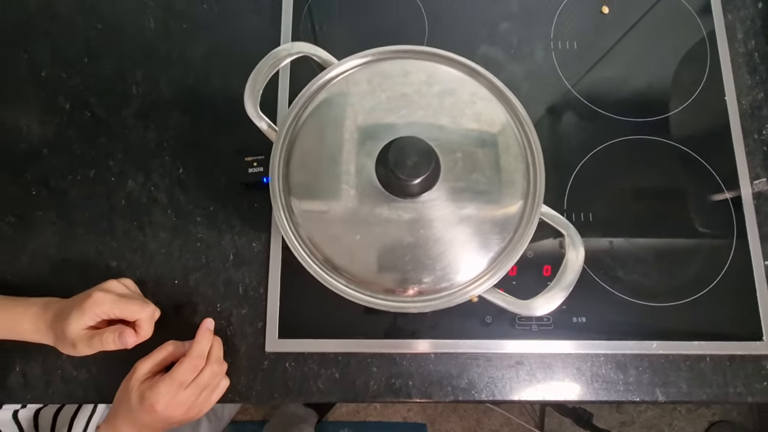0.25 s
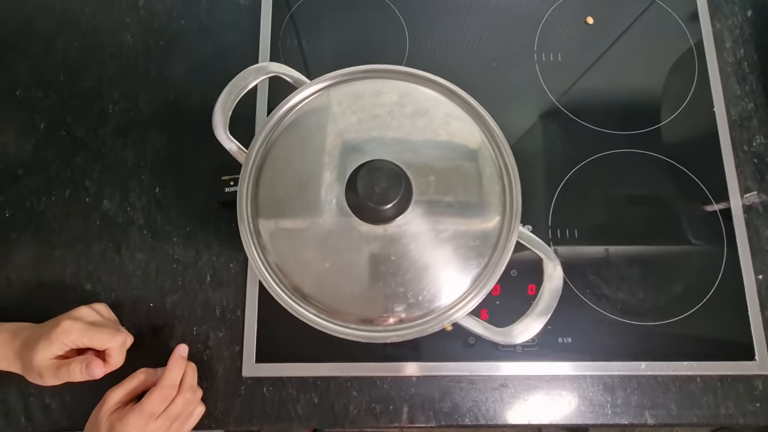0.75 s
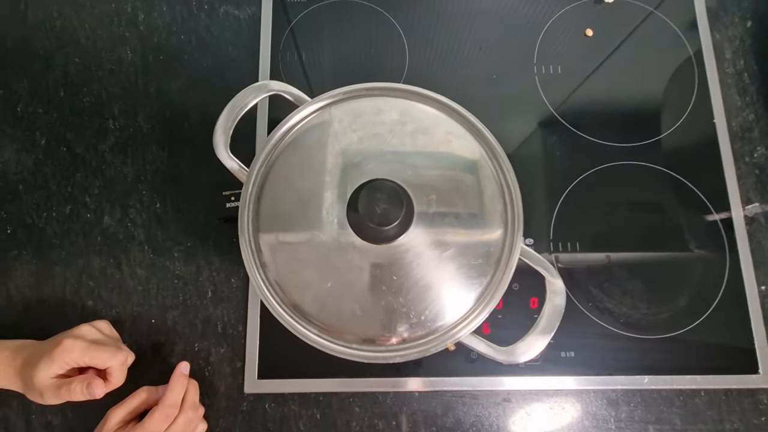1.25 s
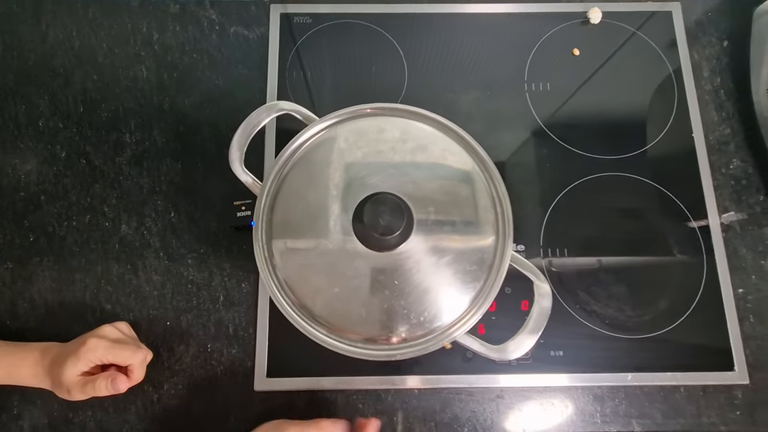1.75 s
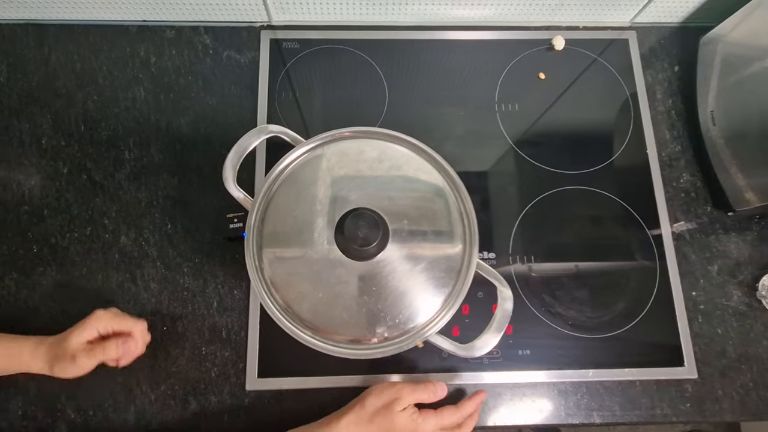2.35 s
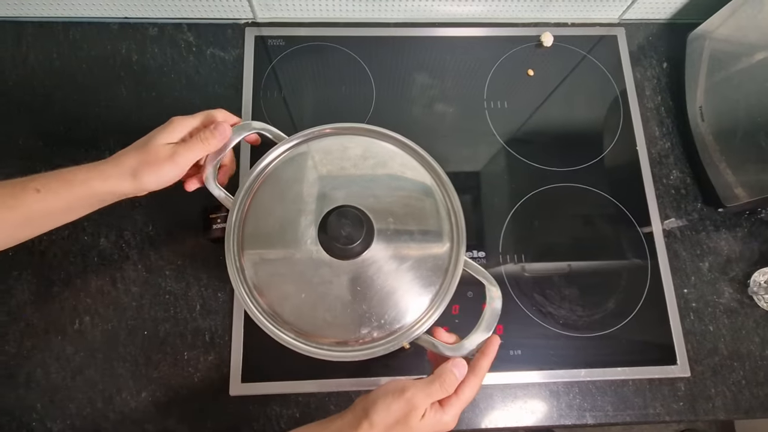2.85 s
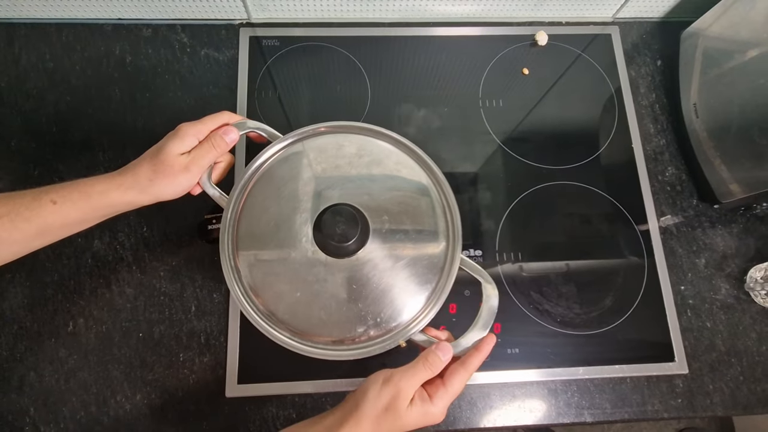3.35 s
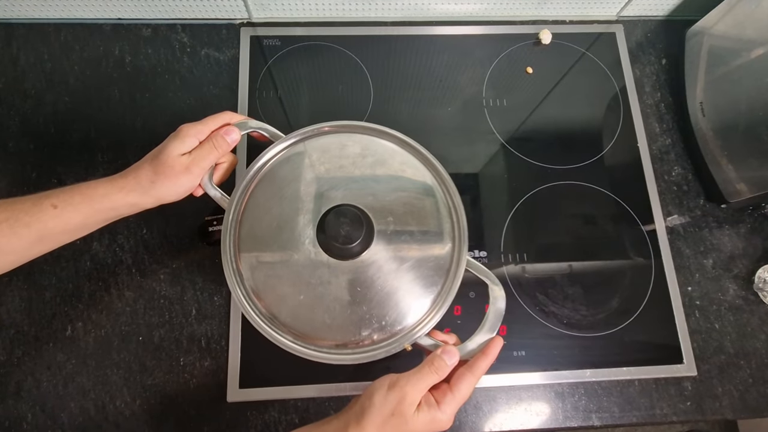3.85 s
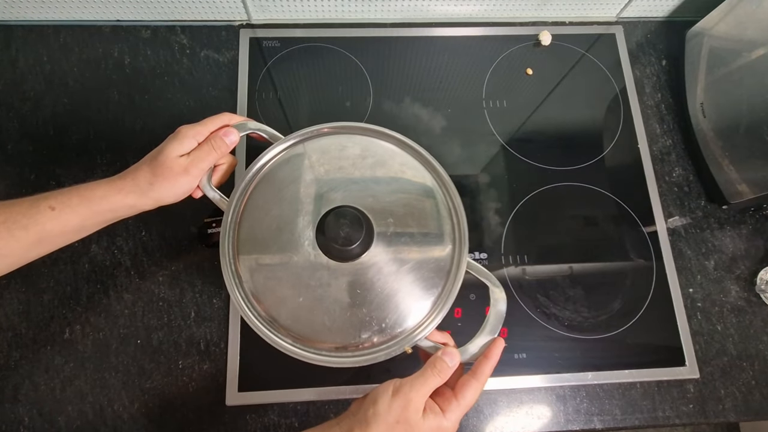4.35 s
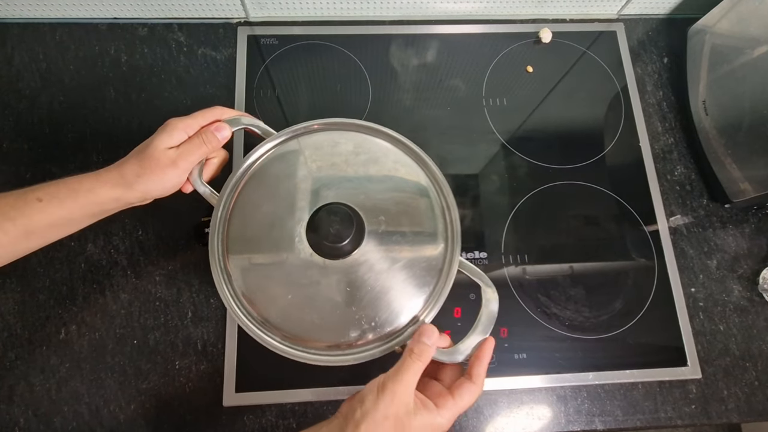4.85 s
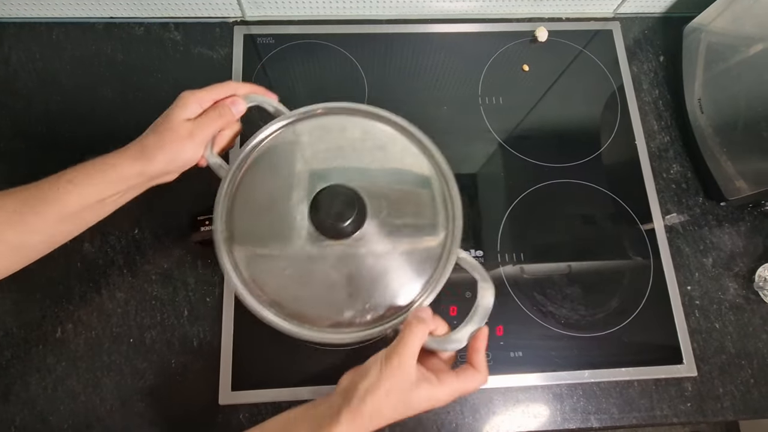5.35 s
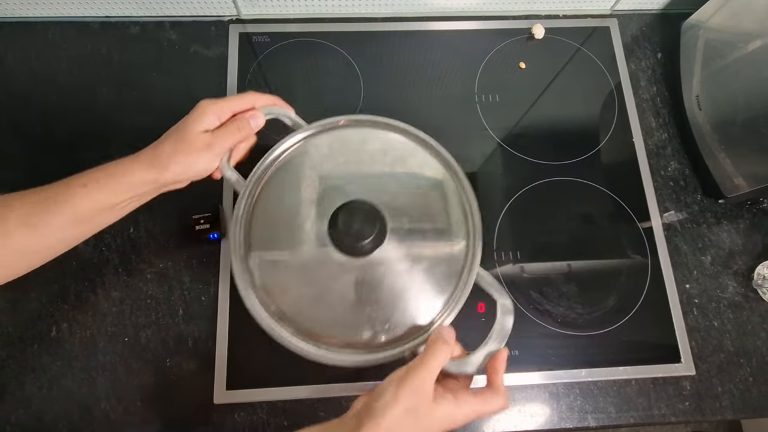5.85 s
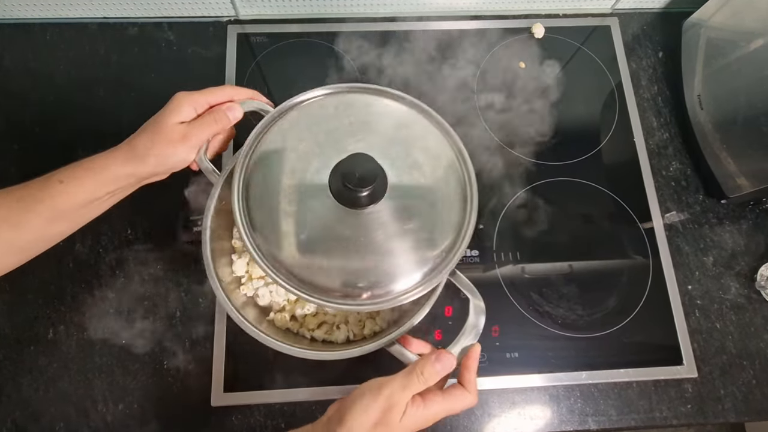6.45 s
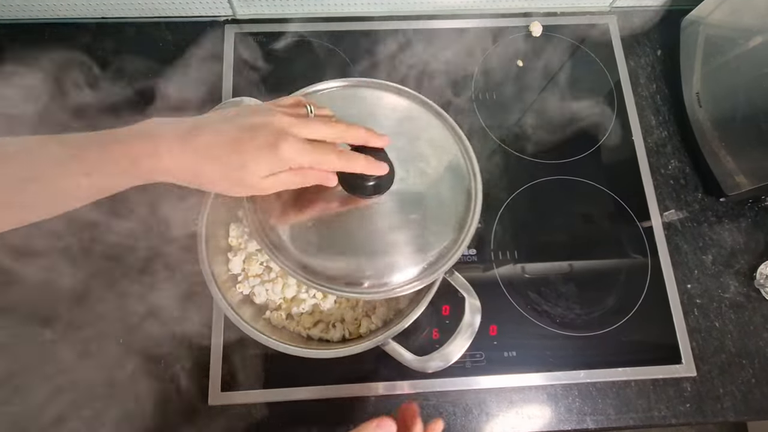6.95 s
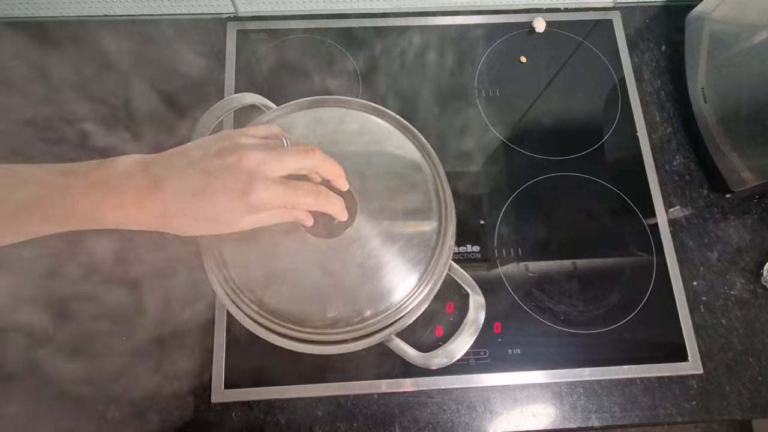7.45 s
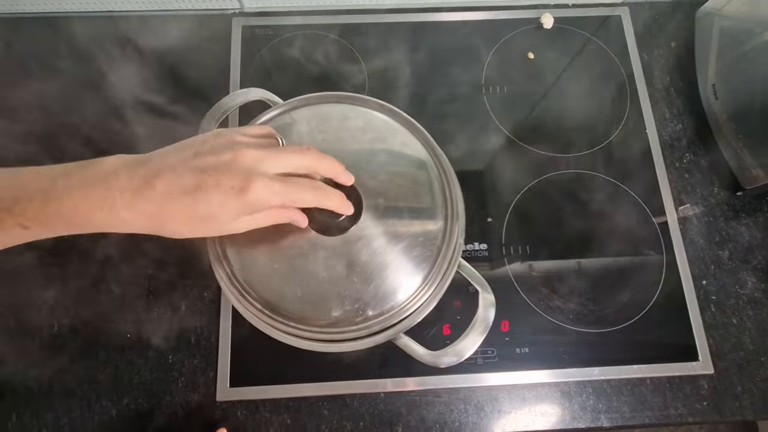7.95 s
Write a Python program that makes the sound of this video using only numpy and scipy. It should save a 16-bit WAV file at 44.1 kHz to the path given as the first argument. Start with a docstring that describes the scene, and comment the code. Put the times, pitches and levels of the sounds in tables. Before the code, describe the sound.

In a small kitchen, kernels burst under the lid of a steel pot: sparse faint ticks with brief oil spitting, then stronger thumping pops with metallic knocks. The pot is then shaken, popcorn swishing and rattling until the lid slips, rings and clatters. The lid is dragged back, a tiny steam spurt follows, and only soft hiss remains. Close microphone, sound in the left channel; faint hiss in the right.

```python
"""Popcorn bursts under the lid of a steel pot on an induction hob while oil spits, then calms, and hob and oil
hiss throughout. The pot is then shaken: popcorn slides, the lid slips off the rim, clatters and is dragged
home, and steam spurts past it. Noise bursts make the cracks; decaying modes make the air thump and the metal
ring; dense grains make the sliding and spitting. Left is the live microphone input; right is a faint hiss."""
import sys
import numpy as np
from scipy import signal
from scipy.fft import rfft, irfft
from scipy.io import wavfile

SR = 44100
rng = np.random.default_rng(int(sys.argv[2]) if len(sys.argv) > 2 else 0)


def generate_wav(sig):
    """Save sig (samples, or channels by samples) to the path in sys.argv[1] as 16-bit PCM at SR."""
    pcm = np.round(np.clip(np.atleast_2d(sig).T, -1, 1) * 32767).astype(np.int16)
    wavfile.write(sys.argv[1], SR, pcm)


N = 362061

# Kernels bursting and bouncing. Each row: time in seconds, knock on the metal in relative dB, knock pitch in Hz,
# crack in relative dB, air thump in relative dB.
BURSTS = [(0.0034, -35, 3180, -32, -37), (0.0412, -38, 1210, -45, -47), (0.0735, -50, 3240, -37.5, -45),
          (0.1138, -43, 3320, -43.5, -56), (0.169, -54, 3260, -44, -70), (0.192, -50, 3220, -42, -54),
          (0.2618, -48, 3360, -49, -55), (0.3824, -56, 3300, -50.5, -59), (0.4212, -28, 3290, -33, -51),
          (0.621, -56, 3300, -42.5, -66), (0.9256, -17, 3330, -28, -24), (0.9772, -34, 3100, -34.5, -41),
          (1.4133, -18.5, 3300, -21, -13), (1.4541, -32, 3340, -39.5, -37), (1.5903, -25, 3440, -56, -52),
          (1.6645, -15.5, 1170, -21.5, -15.5), (1.717, -12, 1180, -48, -40),
          (1.7752, -22.5, 1110, -64, -49), (1.8522, -21, 1080, -46, -42), (1.8768, -4, 1640, -27.5, -17),
          (1.9389, -15.5, 2740, -27.5, -18), (1.9698, -51, 2720, -39, -40),
          (2.2213, -37, 3290, -20.5, -17.5), (2.369, -12.5, 3300, -21.5, -16.5),
          (2.6377, -12.5, 1160, -31, -20.5), (2.7222, -55, 1190, -49, -48),
          (2.8673, -22.5, 1920, -35.5, -28), (2.891, -30, 2860, -41.5, -43.5),
          (3.1202, -9.5, 1110, -22.5, -14), (3.263, -12.5, 3060, -23, -20),
          (3.6764, -26.5, 2370, -39, -47.5), (4.1503, -15, 1610, -25.5, -23),
          (4.189, -1.5, 3204, -21, -17.5), (4.342, -24.5, 2740, -60, -41), (4.39, -26, 1130, -73, -60),
          (4.4535, -38, 2800, -59, -57), (4.4829, -40, 3550, -33.5, -54)]
# Modes of the air in the pot. Each row: pitch in Hz, relative level in dB, decay time t60 in seconds.
AIR_MODES = [(169, -10, .4), (182, 0, .1), (192, -17, .28), (120, -13, .13), (226, -13, .1), (75, -22, .2),
             (307, -9, .12)]
# Modes of the pot wall damped by the seated lid. Each row: pitch in Hz, relative level in dB, t60 in seconds.
WALL_MODES = [(800, -17.5, 0.014), (1080, 2, 0.017), (1110, -12, 0.18), (1168.3, 6.5, 0.13),
              (1194, -3, 0.17), (1252, 3, 0.11), (1355, 2.5, 0.13), (1657, 3.5, 0.054), (1730, 6.5, 0.024),
              (1887, 11, 0.03)]
# Hollow body tone of the pot. Each row: pitch in Hz, relative level in dB, t60 in seconds.
HOLLOW_MODES = [(300, -6, .1), (395, -8, .06), (445, -3, .08), (465, -1, .1), (540, -6, .07),
                (595, -4, .08), (650, -5, .07), (700, -6, .06), (790, -9, .06)]

WANDER_DB, WANDER_PER_S = 3, 14   # every mode is struck harder or softer as the contact point moves


def popping():
    """Bursts under the seated lid: wall follows the knock, lid the crack, hollow the thump; small bits patter."""
    # Small bits settling. Each row: start in seconds, glide in seconds, hold in seconds, relative level in dB.
    patter_rows = [(0, 0.0055, 0.028, -41.5), (1.67, 0.01, 0.02, -30), (1.94, 0.056, 0.024, -45),
                   (4.19, 0.01, 0.019, -35), (4.31, 0.013, 0.014, -46.5)]
    # Colour of the burst crack. Each row: frequency in Hz, relative level in dB per Hz.
    crack_colour = [(290, -20.5), (500, -2), (1390, -12.5), (1890, 1), (2290, -10.5), (3300, 0.5),
                    (3820, -2), (7170, -5), (8600, -16), (14500, -16.5), (16500, -24)]
    # Lid struck from below, damped by the rim. Each row: pitch in Hz, relative level in dB, t60 in seconds.
    lid_modes = [(2600, -8, .04), (2820, -6, .07), (3250, -3, .05), (3400, -2, .06), (4150, -3, .05),
                 (4450, -8, .05), (5300, -8, .04), (5650, -5, .05), (6300, -9, .025), (6900, -8, .025),
                 (7200, -6, .035)]
    s, knock_db, _, crack_db, thump_db = np.transpose(BURSTS)
    # parts: crack, air, wall, lid, hollow
    events = np.transpose([s, crack_db, thump_db, knock_db, crack_db, thump_db])
    drives = blows(events, length_s=0.0077, push_s=0.0014, offsets_db=[4.0, -3.5, 4.5, 21.5, 8.5], strike=0.097)
    patter, = glides(patter_rows, start_db=2, fade_db_per_s=125)
    patter_mix = from_db([[-6.], [-12.], [-9.], [-5.], [-15.]])
    drives += patter * patter_mix * grains(per_s=800, spread_db=-2.0)
    crack, air, wall, lid, hollow = drives
    air = filtered(air, 3, 95, "high")   # the air thump carries no deep rumble
    out = colour(crack, crack_colour) + rings(air, AIR_MODES, wander_db=3.5)
    out += rings(wall, WALL_MODES) + rings(hollow, HOLLOW_MODES) + rings(lid, lid_modes)
    return out + from_db(-11.0) * kernel_knocks(t60=0.026)


def kernel_knocks(t60):
    """Where a kernel lands decides the pitch of its short knock, a decaying sine."""
    t = np.arange(4096) / SR
    out = np.zeros(N + len(t))
    for s, db, hz, *_ in BURSTS:
        i = round(s * SR)
        out[i:i + len(t)] += from_db(db - 60 * t / t60) * np.sin(2 * np.pi * hz * t)
    return out[:N]


def shaking():
    """Knocks and sliding popcorn sound through air, hollow, wall and lid; off its seat the lid frees both to ring."""
    # Pot on the glass, load on the wall, lid on the rim. Each row: time in seconds, then relative dB of crack,
    # air thump, hollow, wall and lid.
    knock_rows = [(4.6803, -49, -41, -56, -49, -69), (4.6973, -48, -47, -43, -69, -67),
                  (4.8298, -34, -35, -44, -29.5, -30.5), (4.8649, -30.5, -28, -35, -31, -48),
                  (4.9619, -28, -34, -24, -36, -21), (4.9736, -31.5, -24.5, -26, -33, -22.5),
                  (5.0929, -35, -31, -37, -30, -32), (5.145, -14.5, -20, -18, -17, -17.5),
                  (5.1601, -18.5, -18.5, -39, -18.5, -32), (5.2335, -25, -26.5, -43, -21, -37),
                  (5.2874, -22, -22, -33, -26, -19), (5.4458, -31, -47, -25, -43, -34),
                  (5.4857, -20, -28, -23, -22.5, -18), (5.5055, -40, -22, -27, -20.5, -21.5),
                  (5.5847, -25.5, -38, -37, -20, -37), (5.6281, -21.5, -31, -28, -18.5, -15),
                  (5.8067, -16.5, -35, -23, -20, -17), (5.8263, -30, -27, -21.5, -18, -20),
                  (5.9194, -23, -37, -34, -19.5, -39), (5.9753, -16, -45, -15.5, -24, -26),
                  (5.9937, -17, -32, -42, -35, -12), (6.0259, -22, -30, -29, -16, -12),
                  (6.0421, -17.5, -29, -35, -13, -11), (6.0851, -17.5, -46.5, -40, -22.5, -22),
                  (6.187, -16.5, -30, -12.5, -27, -38), (6.2914, -21.5, -15, -13.5, -55, -33.5),
                  (6.3196, -18, -37, -12, -19, -24), (6.3415, -18, -45, -16.5, -17, -29.5),
                  (6.3783, -27.5, -39, -7.5, -19, -52), (6.6501, -23.5, -18, -21.5, -21, -32),
                  (6.6803, -14.5, -26.5, -13, -12.5, -26), (6.7059, -18.5, -37, -16, -15.5, -26.5),
                  (6.795, -23, -20, -24, -23, -28), (6.8183, -17.5, -34, -12, -15.5, -22),
                  (6.8456, -17.5, -41.5, -15, -14.5, -17.5), (6.8679, -22, -42.5, -14.5, -15.5, -26),
                  (7.006, -26, -30, -18, -28.5, -28), (7.0667, -25.5, -28.5, -27.5, -34, -30),
                  (7.1302, -22.5, -42, -25, -34.5, -13.5), (7.1462, -13, -42, -27, -16, -8.5),
                  (7.199, -22, -44, -24.5, -33, -14.5), (7.2259, -19.5, -67, -24, -27, -29),
                  (7.263, -31, -43.5, -38, -27, -16.5), (7.3124, -31, -42, -34, -27.5, -23.5),
                  (7.3675, -41, -55.5, -34.5, -33.5, -23.5), (7.4045, -32, -43, -37.5, -31.5, -27.5),
                  (7.476, -37.5, -56, -35.5, -33, -30), (7.8174, -51.5, -72.5, -56, -62, -63.5),
                  (8.1143, -54, -62.5, -61.5, -59, -66)]
    # Popcorn and pot sliding. Each row: start in seconds, glide in seconds, hold in seconds, then relative dB
    # of the slide, the bright rustle and the lid rub.
    slide_rows = [(4.66, 0.035, 0.12, -56.5, -61, -77), (4.85, 0.032, 0.11, -31, -41.5, -53),
                  (5.02, 0.1, 0.015, -26, -39, -42), (5.2, 0.059, 0.028, -25, -37.5, -44.5),
                  (5.37, 0.12, 0.01, -22, -33.5, -43), (5.55, 0.059, 0.022, -28, -36, -41),
                  (5.7, .1, 0.035, -23.5, -32.5, -42), (5.88, 0.071, 0.043, -28, -34, -39),
                  (5.97, 0.013, 0.096, -22.5, -23, -24), (6.18, 0.0065, 0.15, -34.5, -37, -58.5),
                  (6.3, 0.024, 0.072, -25, -29.5, -46), (6.65, 0.014, 0.015, -23, -29, -38.5),
                  (6.79, 0.047, 0.017, -17, -25, -39.5), (7.0, 0.082, 0.025, -34.5, -41, -42),
                  (7.13, 0.014, .08, -28, -34, -36.5), (7.26, 0.027, .14, -37, -47, -44.5)]
    # Wall ringing with the lid off. Each row: pitch in Hz, relative level in dB, t60 in seconds.
    open_wall = [(1044, -25, 0.027), (1111, 7.5, 0.18), (1177, -8.5, 0.12), (1320, 0, 0.05),
                 (1450, -2, 0.14), (1750, -1.5, 0.089), (2567, -0.5, 0.23), (2510, -15, 0.24),
                 (4200, -8.5, 0.06), (4100, -11, 0.05)]
    # Lid ringing free. Each row: pitch in Hz, relative level in dB, t60 in seconds.
    lid_modes = [(2540, -28, 0.093), (2852, -6, 0.054), (2863, 3.5, 0.1), (3000, -17, 0.1),
                 (2885, 5.5, 0.023), (3447, -6, 0.057), (3456, 1, 0.13), (3680, -10.5, 0.085),
                 (4110, -2, 0.059)]
    # Colour of the knock crack. Each row: frequency in Hz, relative level in dB per Hz.
    crack_colour = [(880, -31.5), (1500, -7), (3400, -7), (7100, -12), (8500, -24.5), (12500, -24.5),
                    (15500, -32), (16500, -30.5)]
    lid_off_s, lid_held_s = 5.96, 6.99   # the lid leaves its seat; a hand takes it and drags it home
    seat_damping, held_damping = .15, 0.76   # t60 factors: seat on the lid, hand on wall and lid
    muffle_hz = 5600   # the seated lid dulls cracks
    rub_seated_db, rub_open_db = (-9.5, -2, -10), (-13.5, -5.5, -3)   # rumble, scrape, hollow

    crack, air, hollow, wall, lid = blows(knock_rows, length_s=0.012, push_s=0.0021,
                                          offsets_db=[-2.0, -11.0, 21.0, 21.0, 15.5], strike=0.64)
    slide, rustle, lid_rub = glides(slide_rows, start_db=-14, fade_db_per_s=232.5)
    off = np.arange(N) > lid_off_s * SR
    held = np.arange(N) > lid_held_s * SR
    free = off & ~held
    rub_gains = np.where(off, from_db(rub_open_db)[:, None], from_db(rub_seated_db)[:, None])
    rumble, scrape, hollow_rub = slide * rub_gains

    tumbling = grains(per_s=4000, spread_db=3.)
    crack = crack + rustle * tumbling
    lid = lid + lid_rub * tumbling
    muffled = filtered(crack * ~off, 1, muffle_hz, "low")
    metal = rings(wall * ~off, WALL_MODES) + rings(wall * free, open_wall)
    metal += rings(wall * held, np.array(WALL_MODES) * [1, 1, held_damping])
    metal += rings(lid * ~off, np.array(lid_modes) * [1, 1, seat_damping]) + rings(lid * free, lid_modes)
    metal += rings(lid * held, np.array(lid_modes) * [1, 1, held_damping])
    body = filtered(rings(hollow + hollow_rub * tumbling, HOLLOW_MODES), 2, 260, "high")
    cracks = colour(muffled + crack * off, crack_colour)
    thumps = rings(air + rumble * tumbling, AIR_MODES)
    return cracks + thumps + body + metal + scrape * scraping(patchy_db=4.0, per_s=24)


def scraping(patchy_db, per_s):
    """Dense grains whose colour shifts as the contact wanders: third-octave bands swell on their own."""
    # Colour of the rubbing. Each row: frequency in Hz, relative level in dB per Hz.
    rub_colour = [(120, -42), (200, -9.5), (784, 2), (866, 3), (1100, 4), (1490, -7.5), (2900, -23),
                  (6000, -24), (7800, -57.5), (13200, -120)]
    rubbing = colour(grains(per_s=3500, spread_db=3.), rub_colour)
    out = 0
    for low in 200 * 2 ** np.arange(0, 5, 1 / 3):
        band = filtered(rubbing, 2, [low, low * 2 ** (1 / 3)], "band")
        out = out + from_db(patchy_db * drift(per_s)) * band
    return rms_one(out)


def sizzle():
    """Oil: dense spitting grains at first, lone bright droplet ticks all along."""
    # Oil spits and calms. Each row: start in seconds, glide in seconds, hold in seconds, relative level in dB.
    spit_rows = [(0, .01, 0.31, -48)]
    spits = filtered(grains(per_s=5800, spread_db=3.5), 2, [1500, 9000], "band")
    ticks = filtered(grains(per_s=18, spread_db=1.0), 2, 6000, "high")
    spit_gain, = glides(spit_rows, start_db=6, fade_db_per_s=45)
    return spit_gain * spits + from_db(-76.5) * ticks


def steam():
    """A short bright spurt of coloured noise past the closing lid."""
    # Steam spurt. Each row: start in seconds, glide in seconds, hold in seconds, relative level in dB.
    spurt_rows = [(7.585, .03, 0.015, -43.5)]
    # Colour of the steam. Each row: frequency in Hz, relative level in dB per Hz.
    steam_colour = [(1180, -51), (2000, -11.5), (2670, -41.5), (3490, -2), (4860, 3), (11000, -21),
                    (16000, -32)]
    gain, = glides(spurt_rows, start_db=-4.0, fade_db_per_s=400.5)
    return gain * colour(rng.standard_normal(N), steam_colour)


def hiss():
    """Broad hiss of oil and room as coloured noise, with narrow resonant bands from the hob and the metal."""
    # Hiss over time. Each row: time in seconds, broad hiss in relative dB, narrow bands in relative dB.
    level_rows = [(0, -58, -56.5), (1.5, -54.5, -56), (3, -56.5, -58.5), (4.6, -56.5, -58),
                  (7.5, -55.5, -63.5), (8.21, -62.5, -59.5)]
    # Colour of the broad hiss. Each row: frequency in Hz, relative level in dB per Hz.
    broad_colour = [(18, -42), (30, -12.5), (98, 12.5), (641, -1.5), (792, -38), (858, -1.5), (2220, -12),
                    (3480, 3), (4410, -2), (5440, 5.5), (6380, -20.5), (9500, -16), (13000, -24),
                    (15200, -20.5), (16500, -25)]
    # Narrow hissing bands. Each row: centre in Hz, width in Hz (5 at least), relative level in dB.
    band_rows = [(783.4, 2.9, 14.5), (3385, 38, 12.5), (3760, 13, 17), (3770, 15, -0.5), (4600, 28, -16),
                 (5000, 119, -13), (4910, 87, -23), (5500, 490, 4), (5840, 160, 6.5), (6800, 340, -1.5),
                 (9160, 350, -1), (10100, 58, -11.5), (11300, 500, -13.5), (15030, 850, -8)]
    broad_gain, bands_gain = levels(level_rows)
    noise, narrow = rng.standard_normal(N), 0
    for hz, width, db in band_rows:
        r = np.exp(-np.pi * max(width, 5) / SR)
        resonance = [1, -2 * r * np.cos(2 * np.pi * hz / SR), r * r]
        band = signal.lfilter([1, 0, -1], resonance, noise)
        narrow = narrow + from_db(db) * (1 - r * r) / 2 * band
    return broad_gain * colour(rng.standard_normal(N), broad_colour) + bands_gain * rms_one(narrow)


def kitchen(x):
    """Diffuse echo: octave bands of noise, each dying at its own rate, convolved with the sound."""
    # Echo decay of the kitchen. Each row: frequency in Hz, t60 in seconds.
    decay_rows = [(250, 0.54), (500, 0.56), (2000, 0.56), (6000, 0.25), (14000, 0.42)]
    decay_hz, decay_s = np.transpose(decay_rows)
    t, tail = np.arange(SR) / SR, 0
    for low in 175 * 2. ** np.arange(7):
        band = filtered(rng.standard_normal(SR), 2, [low, min(2 * low, .45 * SR)], "band")
        t60 = np.interp(np.log(np.sqrt(2) * low), np.log(decay_hz), decay_s)
        tail = tail + band * from_db(-60 * t / max(t60, .05))
    tail *= np.clip(t / .015, 0, 1)      # the first walls answer late
    return signal.oaconvolve(x, tail / np.sqrt(np.sum(tail ** 2)))[:N]


def idle_input():
    """Self-noise of the unused right input: band-passed noise, mostly treble."""
    # Self-noise over time. Each row: time in seconds, level in dB.
    idle_rows = [(0, -102), (1.5, -84), (5.95, -86), (6.0, -87), (8.21, -109.5)]
    treble = filtered(rng.standard_normal(N), 6, [5500, 15800], "band")
    return levels(idle_rows)[0] * rms_one(treble)


def blows(events, length_s, push_s, offsets_db, strike):
    """Each blow is a dying noise burst for crack and metal and one soft push on the air: one drive per part."""
    t, parts = np.arange(4096) / SR, len(events[0]) - 1
    push = -np.hanning(round(push_s * SR) + 3)
    push = np.pad(push, (0, len(t) - len(push)))
    drives = np.zeros((parts, N + len(t)))
    for s, *parts_db in events:
        i = round(s * SR)
        burst = rng.standard_normal(len(t)) * np.exp(-t / length_s)
        contact = burst / np.sqrt(np.sum(burst ** 2))
        contact[0] += strike         # metal takes the burst's energy plus a first strike
        burst[0] += 12 * strike      # the crack opens with a snap
        shapes = np.tile(contact, (parts, 1))
        shapes[0], shapes[1] = burst, push
        drives[:, i:i + len(t)] += from_db(np.add(parts_db, offsets_db))[:, None] * shapes
    return drives[:, :N]


def rings(drive, modes, wander_db=WANDER_DB):
    """Drive through a set of decaying modes whose joint response has about unit energy."""
    hz, db, t60 = np.transpose(modes)
    radius = from_db(-60 / (np.maximum(t60, .01) * SR))
    angle = 2 * np.pi * hz / SR
    gains = from_db(db) / np.sqrt(np.sum(from_db(db) ** 2 / (1 - radius ** 2) / 2))
    out = 0
    for g, r, w in zip(gains, radius, angle):
        struck = drive * from_db(wander_db * drift(WANDER_PER_S)) + 1e-18
        out = out + signal.lfilter([0, g * np.sin(w)], [1, -2 * r * np.cos(w), r * r], struck)
    return out


def grains(per_s, spread_db):
    """Random tiny impacts of uneven size and either sign, rms 1."""
    sizes = from_db(spread_db * np.minimum(rng.exponential(1, N), 5)) * rng.choice([-1, 1], N)
    return rms_one(sizes * (rng.random(N) < per_s / SR))


def glides(rows, start_db, fade_db_per_s):
    """Gains per dB column: each row starts start_db above or below its level, glides to it, holds and fades."""
    t, power = np.arange(N) / SR, 0
    for s, glide, hold, *db in rows:
        glide_db = start_db * np.clip(1 - (t - s) / max(glide, .002), 0, 1)
        fade_db = fade_db_per_s * np.maximum(t - s - glide - hold, 0)
        power = power + (from_db(db)[:, None] * from_db(glide_db - fade_db) * (t >= s)) ** 2
    return np.sqrt(power)   # energies of overlapping rows add


def levels(rows):
    """Gains in time from dB columns; silent outside the table."""
    s, *columns = np.transpose(rows)
    t = np.arange(N) / SR
    return [from_db(np.interp(t, s, c, left=-200, right=-200)) for c in columns]


def drift(per_s):
    """Slow random wander: straight lines between normal knots of spread 1."""
    knots = rng.standard_normal(N // 500)
    return np.interp(np.arange(N) / SR * min(per_s, 80), np.arange(len(knots)), knots)


def colour(x, points):
    """Shape by a spectrum in dB over log frequency, keeping white noise at its rms."""
    point_hz, point_db = np.transpose(points)
    hz = np.maximum(np.fft.rfftfreq(len(x), 1 / SR), 10)
    gain = from_db(np.interp(np.log(hz), np.log(point_hz), point_db))
    cepstrum = irfft(np.log(gain + 1e-9))       # folding the cepstrum makes the filter causal
    cepstrum[1:len(cepstrum) // 2] *= 2
    cepstrum[len(cepstrum) // 2 + 1:] = 0
    response = np.exp(rfft(cepstrum)) / np.sqrt(np.mean(gain ** 2))
    return irfft(rfft(x) * response, len(x))


def filtered(x, order, hz, kind):
    """Butterworth filter with its edge or edges in Hz."""
    return signal.sosfilt(signal.butter(order, hz, kind, fs=SR, output="sos"), x)


def from_db(db):
    """dB to gain."""
    return 10 ** (np.asarray(db) / 20)


def rms_one(x):
    """Scale to rms 1."""
    return x / np.sqrt(np.mean(x ** 2) + 1e-20)


def scene():
    """Left: the pot in the kitchen over the hiss; right: the idle input."""
    near = popping() + shaking() + steam() + sizzle()
    left = near + from_db(-12) * kitchen(near) + hiss()
    return np.array([from_db(6) * left, idle_input()])


def record(dry):
    """The microphone drops deep bass, the converter overloads softly, the top is cut, faint white hiss comes last."""
    mic_low_hz, cutoff_hz, white_db = 62, 16900, -97
    top = .92   # ceiling the overload bends towards
    heard = filtered(dry, 4, mic_low_hz, "high")
    rounded = heard / (1 + np.abs(heard / top) ** 4) ** .25
    cut = signal.sosfilt(signal.cheby2(12, 70, cutoff_hz, fs=SR, output="sos"), rounded)
    return cut + from_db(white_db) * rng.standard_normal(dry.shape)


dry = scene()
out = record(dry)
generate_wav(out)
```